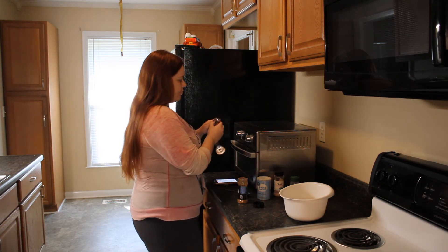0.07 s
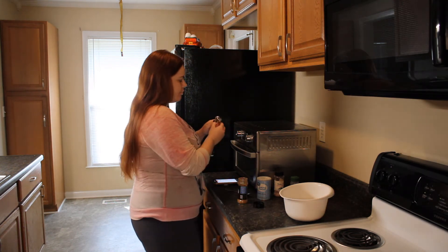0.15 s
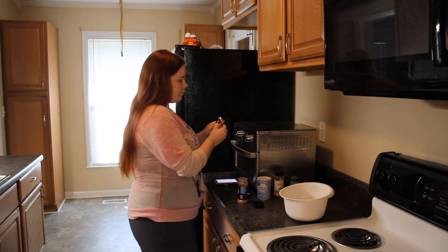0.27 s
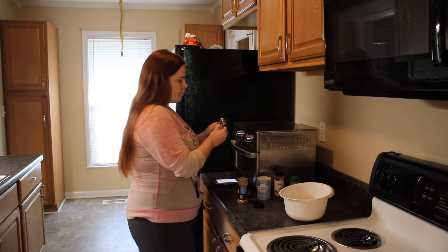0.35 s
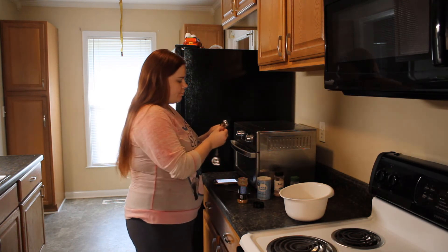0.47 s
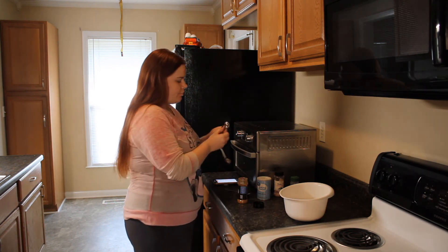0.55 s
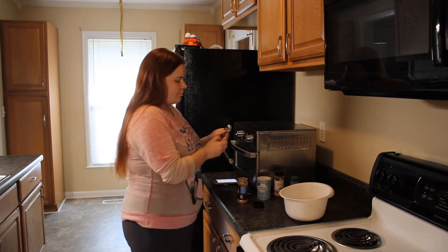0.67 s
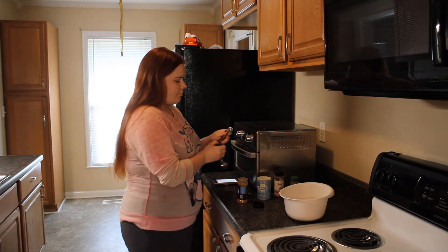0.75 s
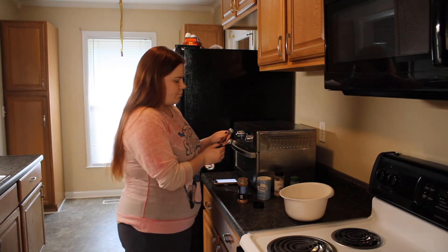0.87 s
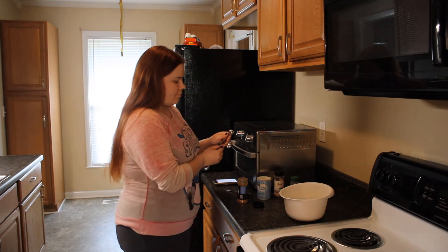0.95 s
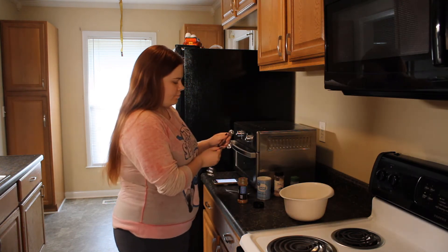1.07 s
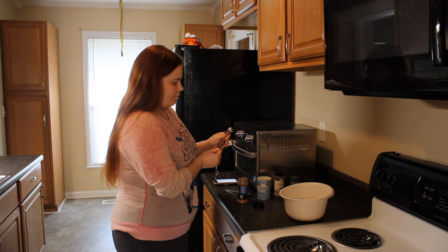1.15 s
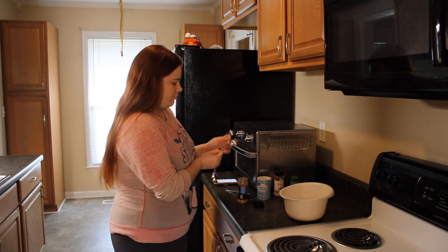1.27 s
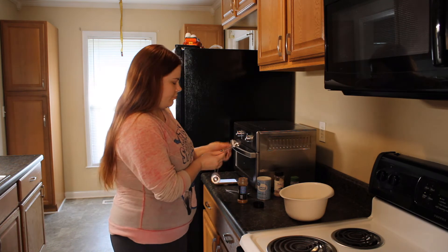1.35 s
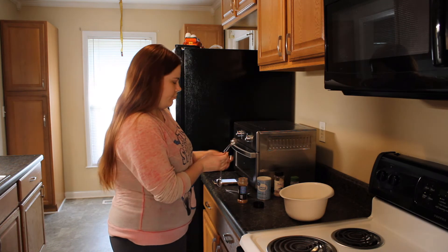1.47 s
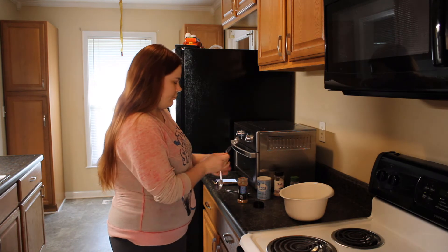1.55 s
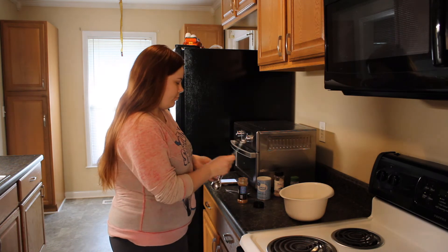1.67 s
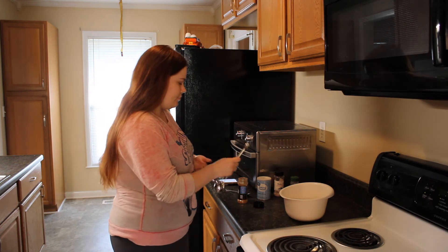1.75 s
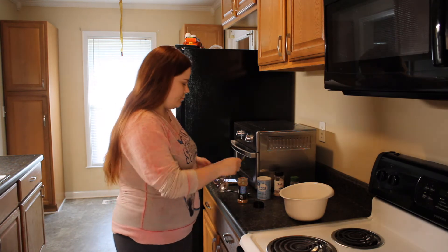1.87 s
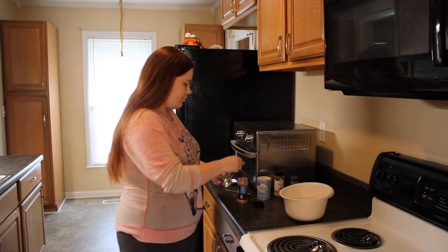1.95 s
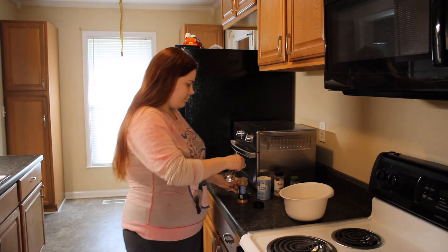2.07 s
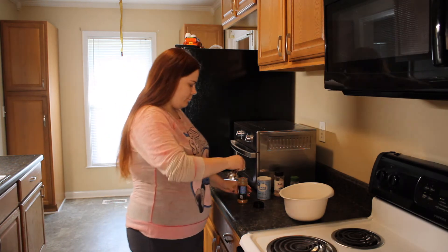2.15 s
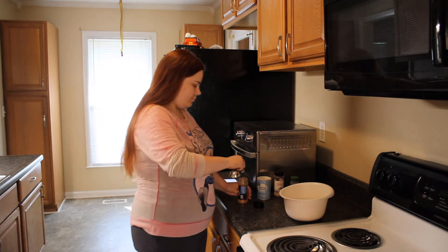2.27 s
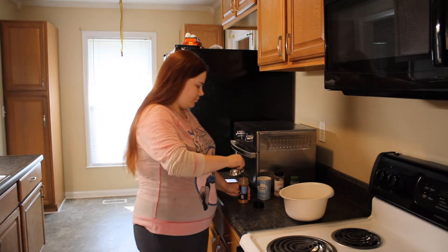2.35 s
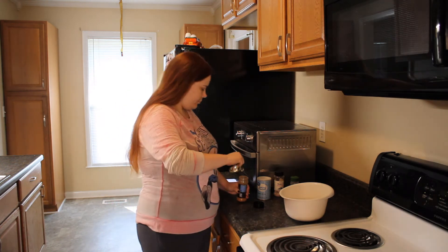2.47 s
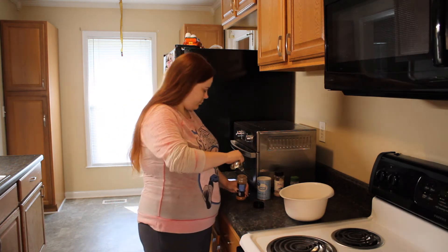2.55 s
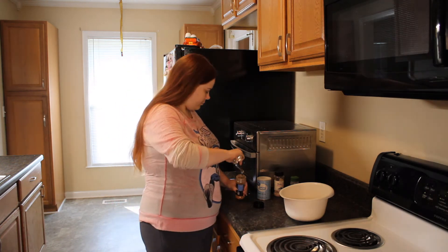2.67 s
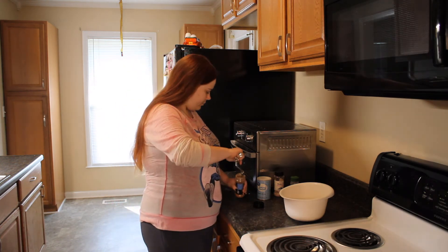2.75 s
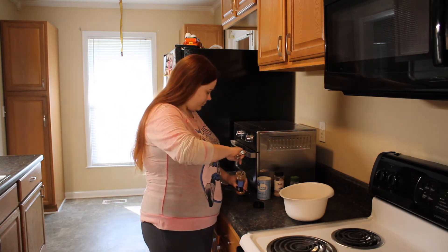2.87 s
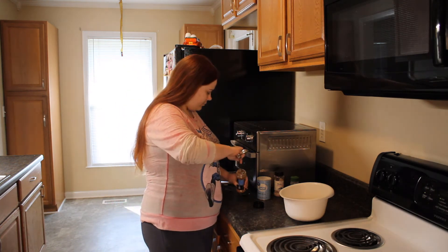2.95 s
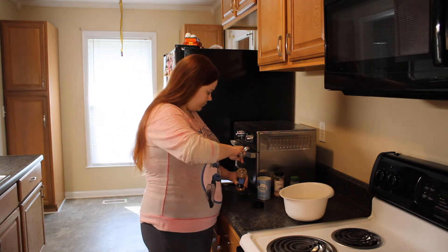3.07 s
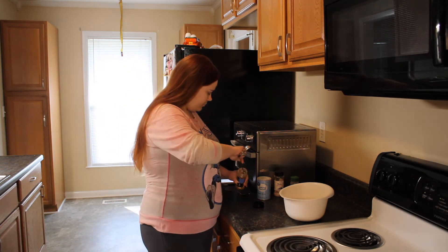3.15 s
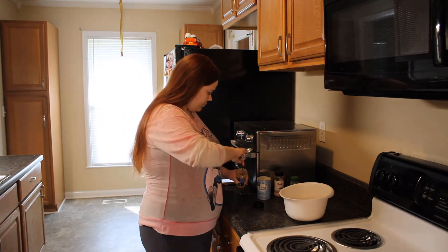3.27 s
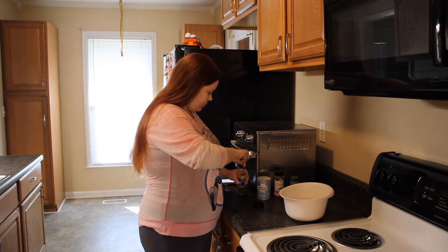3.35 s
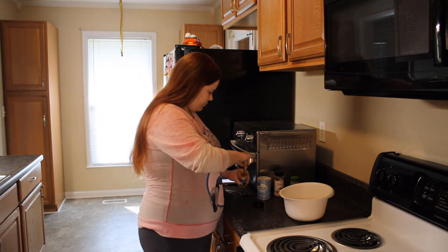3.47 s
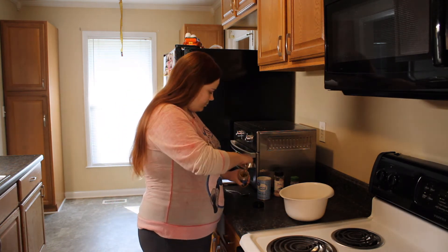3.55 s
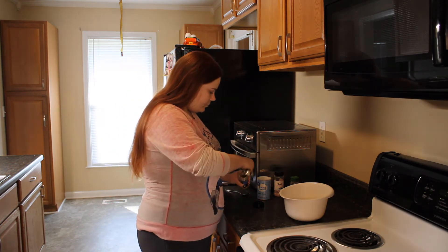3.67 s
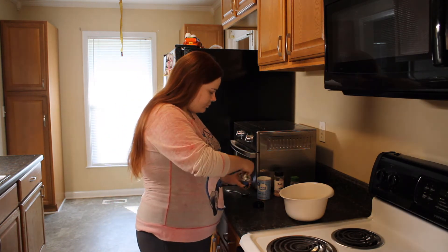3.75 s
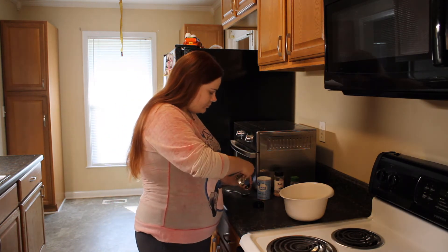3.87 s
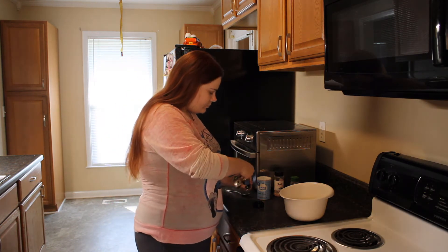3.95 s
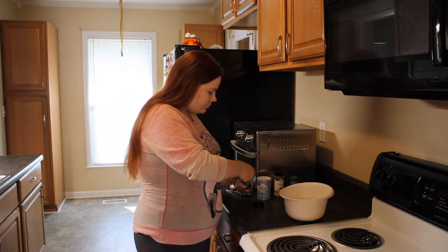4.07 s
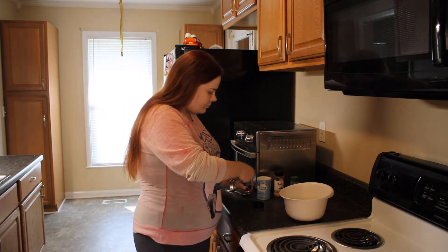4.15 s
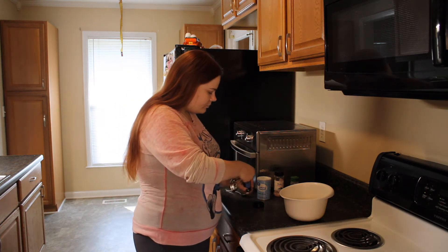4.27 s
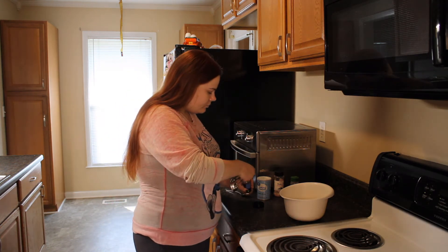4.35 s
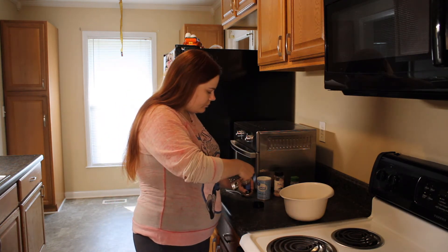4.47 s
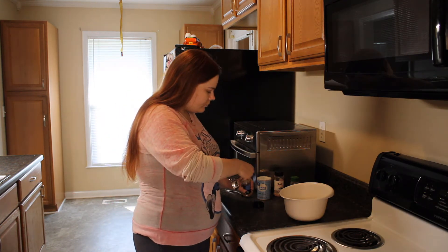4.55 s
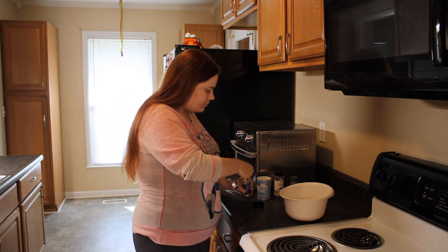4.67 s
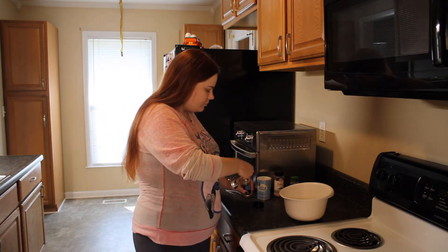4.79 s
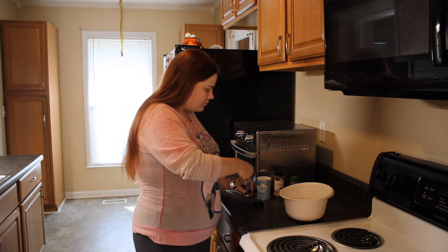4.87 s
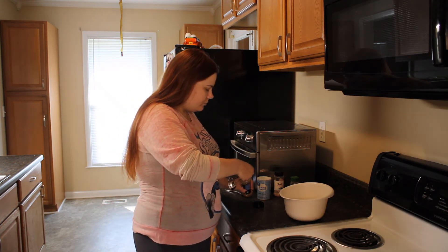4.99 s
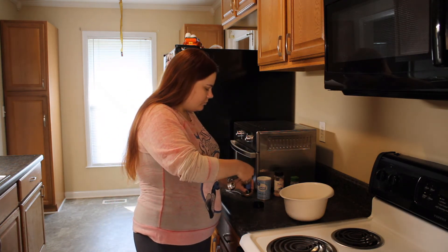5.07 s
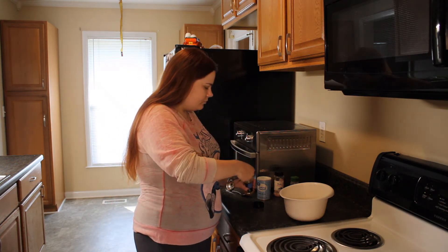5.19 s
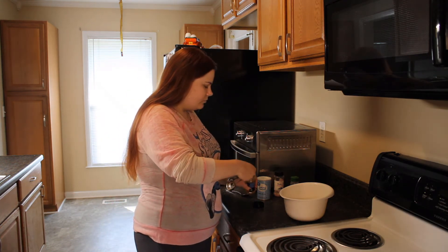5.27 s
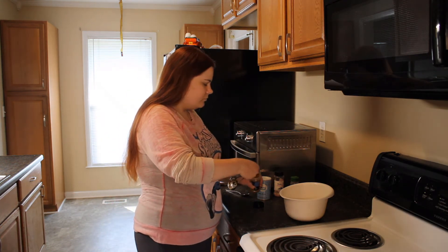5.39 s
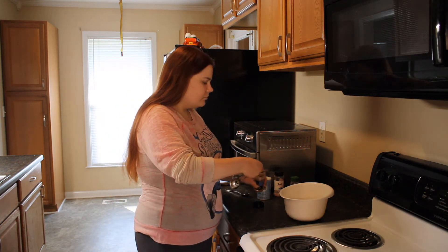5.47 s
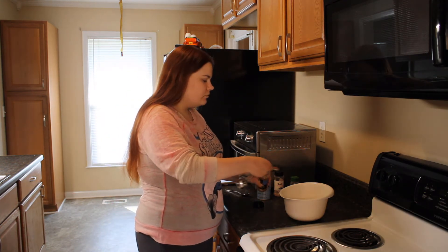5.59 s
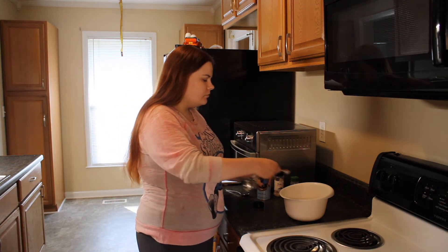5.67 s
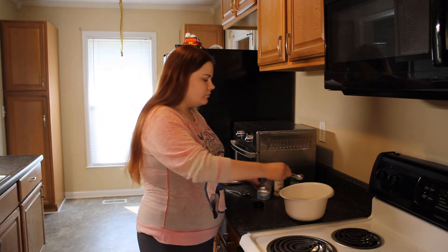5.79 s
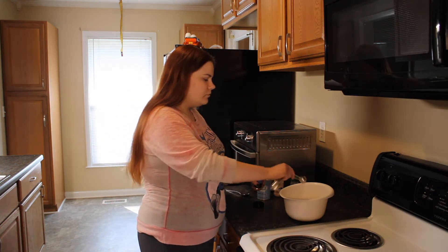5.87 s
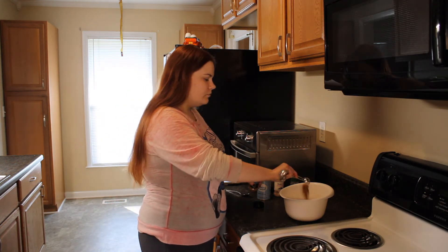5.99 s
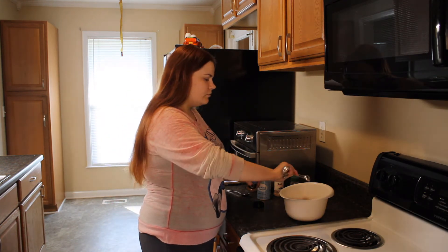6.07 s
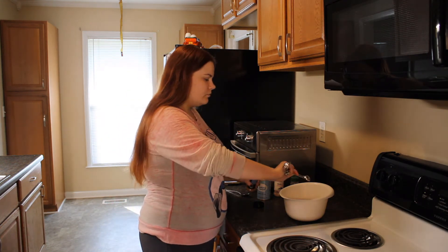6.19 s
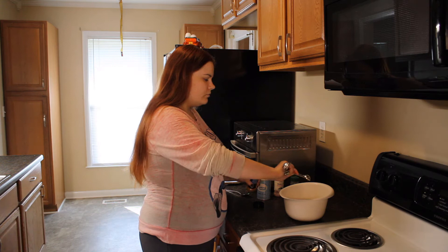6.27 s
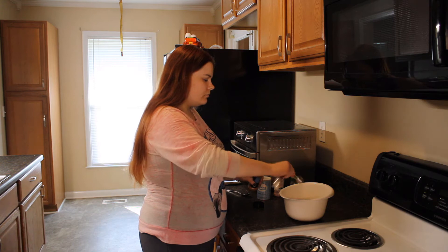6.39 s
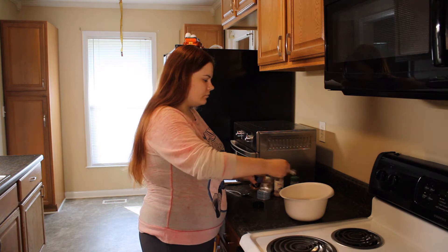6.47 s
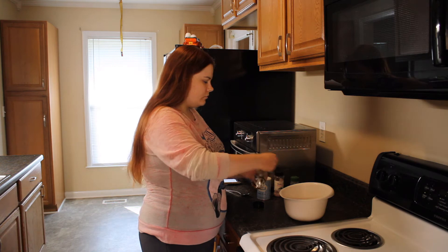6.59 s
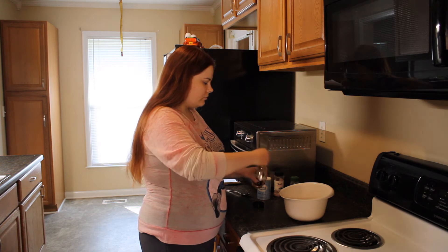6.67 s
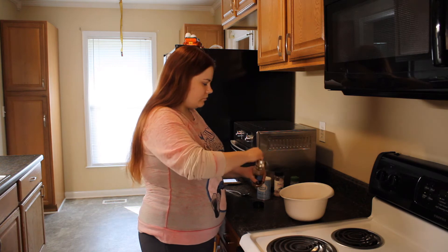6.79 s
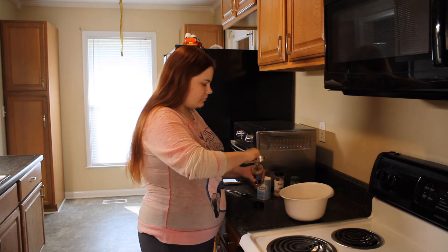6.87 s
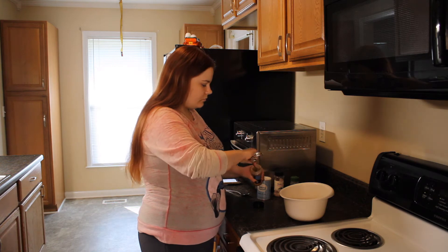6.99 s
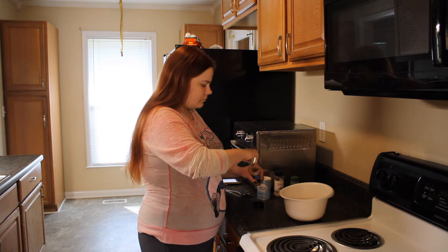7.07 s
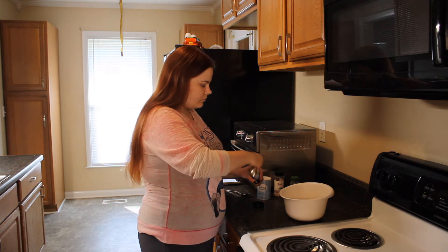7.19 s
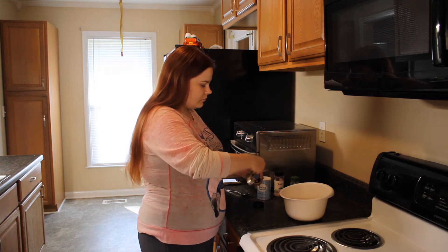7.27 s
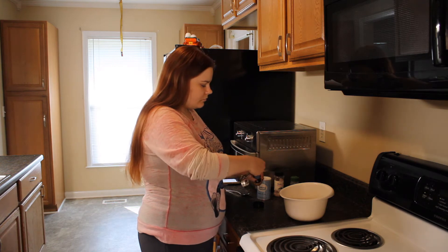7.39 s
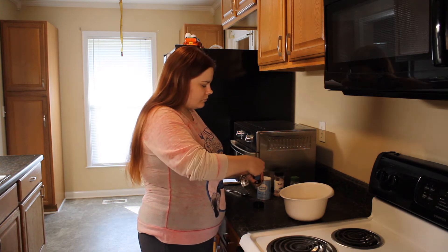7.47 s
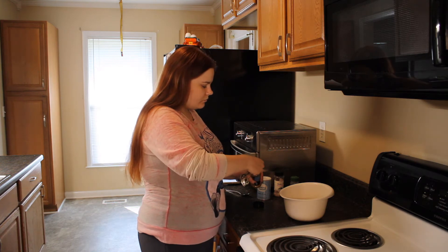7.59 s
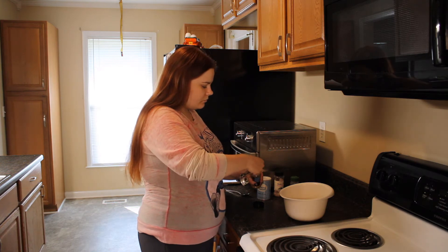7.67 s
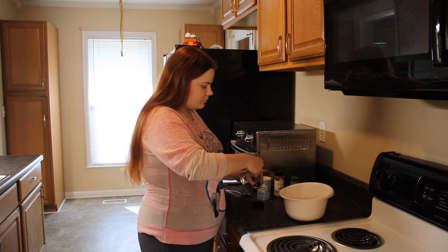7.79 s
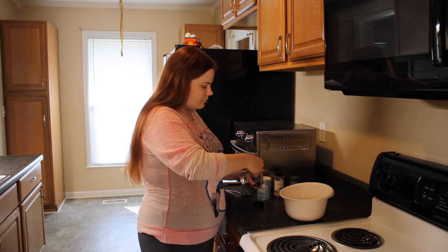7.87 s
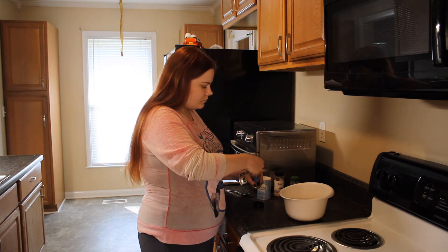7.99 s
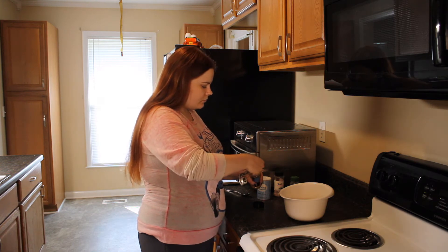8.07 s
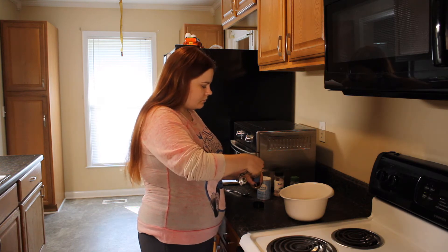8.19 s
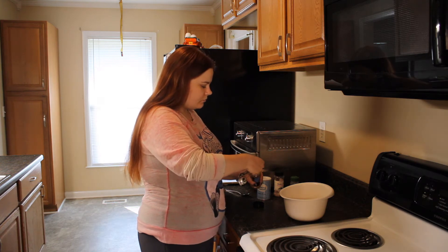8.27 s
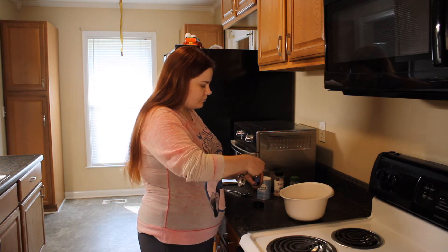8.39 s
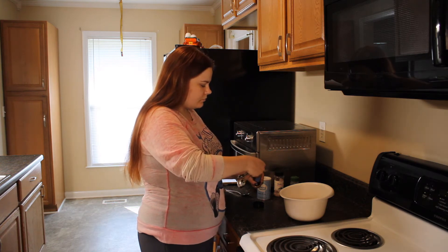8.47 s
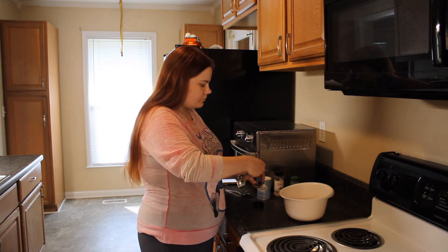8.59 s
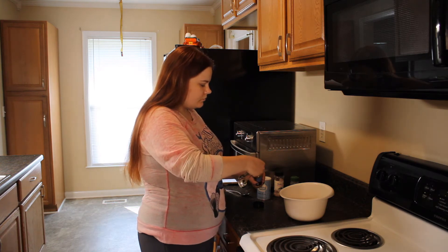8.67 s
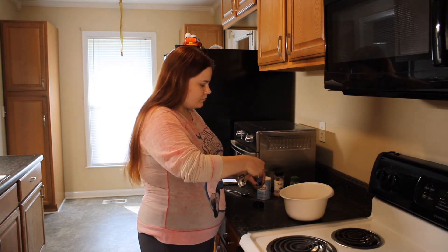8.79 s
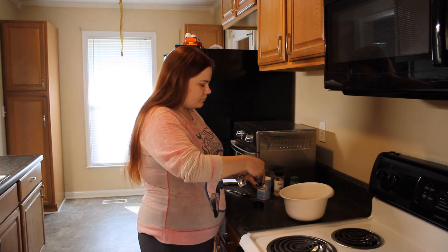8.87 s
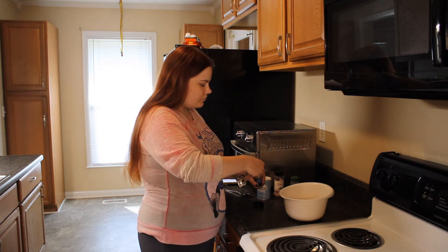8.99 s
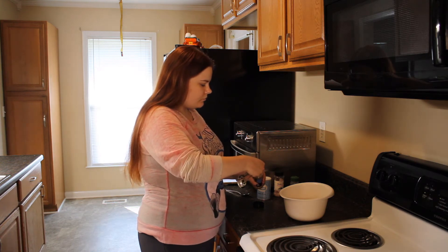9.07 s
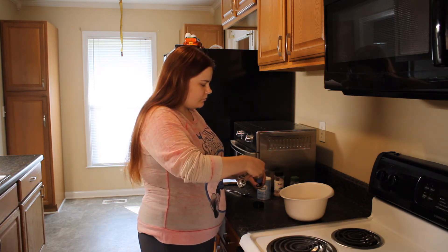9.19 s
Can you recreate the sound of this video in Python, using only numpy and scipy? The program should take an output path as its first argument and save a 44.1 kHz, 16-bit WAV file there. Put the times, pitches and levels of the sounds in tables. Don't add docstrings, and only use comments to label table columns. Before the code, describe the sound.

Bright clinking of thin metal spoons builds to a sharp clatter, followed by quiet jar bumps, ticks and isolated knocks in a hard, humming kitchen.

```python
import sys
import numpy as np
from scipy import signal
from scipy.fft import rfft, irfft
from scipy.io import wavfile
from scipy.ndimage import uniform_filter1d

SR = 44100
rng = np.random.default_rng(int(sys.argv[2]) if len(sys.argv) > 2 else 0)


def digitize_waveform(pressure):
    field = np.atleast_2d(pressure).T
    bounded = np.clip(field, -1, 1)
    quanta = np.round(bounded * 32767).astype(np.int16)
    wavfile.write(sys.argv[1], SR, quanta)


def makeup_ratio(level_db):
    decades = np.asarray(level_db, float) / 20
    return 10 ** decades


N = 407043


def evened(x):
    return x / np.sqrt(np.mean(x ** 2) + 1e-20)


def read(points, hz):
    f, value = np.transpose(points)
    return np.interp(np.log(hz + 1), np.log(f + 1), value)


def add(mix, start_s, sound):
    part = mix[round(start_s * SR):][:len(sound)]
    part += sound[:len(part)]


def noise(points, size):
    spectrum = rfft(rng.standard_normal(size))
    gain = makeup_ratio(read(points, np.fft.rfftfreq(size, 1 / SR)))
    return evened(irfft(spectrum * gain, size))


def levelled(sound, db):
    return makeup_ratio(db) * sound / np.sqrt(uniform_filter1d(sound ** 2, 88).max())


def coloured(x, colour, smooth_hz):
    z, hz = rfft(x), np.fft.rfftfreq(len(x), 1 / SR)
    bins = max(int(smooth_hz / hz[1]), 1)
    lumps = np.sqrt(abs(uniform_filter1d(abs(z) ** 2, bins)) + 1e-12)
    cepstrum = irfft(np.log(makeup_ratio(read(colour, hz)) / lumps))
    cepstrum[1:len(x) // 2] *= 2
    cepstrum[len(x) // 2 + 1:] = 0
    return irfft(z * np.exp(rfft(cepstrum)))


# pitch_hz, level_db (per Hz)
HISS = [(20, -15.5), (40, -7), (80, -13.5), (150, -10), (300, -10.5), (500, -13), (1000, -16.5),
        (2200, -20.5), (3650, -23.5), (6000, -28), (8900, -33.5), (12000, -40.5), (15500, -49)]
# pitch_hz, level_db
FRIDGE_HUM = [(120, -70.5), (240, -56.5), (323, -76), (360, -66.5), (600, -75), (1081, -74)]


def background():
    t = np.arange(N) / SR
    hum = np.zeros(N)
    for hz, db in FRIDGE_HUM:
        waver_db = 2.27 * np.sin(2 * np.pi * (0.606 * t + rng.random()))
        hum += makeup_ratio(db + 1.5 + waver_db) * np.sin(2 * np.pi * (hz * t + rng.random()))
    return makeup_ratio(-52.5) * noise(HISS, N) + hum


def chatter(length_s):
    when, size = rng.random((2, 12))
    place = np.clip(when * length_s * 2 * SR, 0, 2047).astype(int)
    train = np.zeros(2048)
    np.add.at(train, place, (size - 0.5) * 1.72 * (1 - when))
    train[0] += 1
    return train


def burst(colour, train, t60):
    t = np.arange(4096) / SR
    puff_power = makeup_ratio(-120 * t / t60) * (1 - np.exp(-t / 0.00063))
    envelope = np.sqrt(abs(signal.fftconvolve(train ** 2, puff_power)[:len(t)]))
    return coloured(envelope * rng.standard_normal(len(t)), colour, smooth_hz=350)


def strike(modes, crack, row, tilt_hz, crack_t60, held, least_width):
    start_s, db, dull_db = row
    damping, chatter_s, outer_db, crack_db = held
    hz, width, mode_db = (np.tile(c, 2)[:, None] for c in np.transpose(modes))
    tilt = list(zip(tilt_hz, (outer_db + dull_db, 0, outer_db - dull_db)))
    place, detune, late = rng.standard_normal((3, *hz.shape))
    width = np.maximum(width * damping, least_width)
    is_twin = (np.arange(len(hz)) >= len(modes))[:, None]
    hz = hz + 0.35 * width * detune * is_twin
    t = np.maximum(np.arange(6144) / SR - 0.45 * chatter_s * abs(late), 0)
    fade = np.exp(-np.pi * width * t) * (1 - np.exp(-t / 0.0011))
    gain = width * makeup_ratio(mode_db + 1.2 * place + read(tilt, hz))
    sound = levelled((gain * fade * np.sin(2 * np.pi * hz * t)).sum(0), 0)
    crack_colour = [(f, level_db + read(tilt, f)) for f, level_db in crack]
    add(sound, 0, levelled(burst(crack_colour, chatter(chatter_s), crack_t60), crack_db))
    return start_s, levelled(sound, db)


# pitch_hz, width_hz, level_db
TINY_MODES = [(3210, 59, -5), (3950, 78, -7), (4600, 160, -8), (5520, 180, 1), (6100, 34, -4),
              (6200, 48, -5), (6570, 140, -13), (7540, 19, -12), (7820, 110, -8), (8270, 36, -10),
              (8500, 32, -8), (9100, 49, -11), (11000, 90, -17)]
SMALL_MODES = [(1780, 26, -3.5), (2950, 56, -2.5), (3700, 30, -5), (4070, 55, -2), (4360, 26, -5),
               (4660, 210, 4), (5070, 35, 0), (5300, 29, -2), (5640, 190, 1), (5860, 39, 0), (6520, 38, 4),
               (7100, 75, -1), (7220, 35, -8), (7700, 40, -4), (8610, 46, -22), (9140, 35, -9),
               (10660, 42, -15), (10800, 80, -11)]
MIDDLE_MODES = [(2950, 43, -19), (3990, 30, -6), (4130, 50, -4), (4730, 180, -2), (4870, 28, -5),
                (5150, 25, -15), (5400, 28, -19), (5920, 82, -20), (6500, 66, -2), (6730, 15, -5),
                (7490, 34, 4), (7730, 33, 0), (7950, 68, -7), (8540, 51, -16), (8790, 41, -11),
                (9060, 60, -8), (10900, 58, -13.5), (13400, 41, -30)]
LARGE_MODES = [(2296, 72, -24.5), (2570, 97, -21), (2940, 25, -11), (3630, 65, 3), (4650, 39, -11.5),
               (4930, 24, -5.5), (5444, 110, -14), (5700, 40, -5), (6200, 42, -23), (6170, 73, -7),
               (6740, 59, 4), (7580, 98, 4.5), (7800, 15, 8), (8130, 50, 5.5), (8680, 29, -17),
               (9070, 32, -6.5), (9800, 57, -16), (10100, 100, -6), (10300, 27, -18), (10800, 32, -18),
               (11300, 57, -26), (11400, 45, -27), (11700, 52, -25), (12200, 55, -21), (12500, 100, -24),
               (12600, 15, -25), (13500, 74, -24), (14000, 36, -29)]
SHAKEN_MODES = [(1680, 130, -25.5), (3490, 26, -14), (3720, 91, -7), (4120, 43, -13.5), (4930, 29, -8.5),
                (5670, 38, -12), (6030, 230, -11), (6600, 47, -8.5), (6720, 16, -10), (7010, 39, -7),
                (7350, 33, -8), (7600, 45, -5), (7800, 45, 0.5), (7800, 59, -12), (8260, 110, -20),
                (8820, 41, -17), (9070, 37, -14), (9810, 42, -24), (10300, 46, -25), (10600, 30, -21),
                (10800, 47, -22), (11500, 34, -17), (12040, 36, -17.5), (12060, 31, -19.5),
                (12600, 32, -25), (13500, 38, -35), (14200, 43, -40.5), (15000, 95, -41)]
DROPPED_MODES = [(1680, 110, -23), (3630, 40, -7), (3960, 16, -12.5), (4140, 55, -9), (4650, 49, -13.5),
                 (4890, 45, -16.5), (5220, 24, -17), (5250, 64, -13), (5600, 41, -4.5), (5990, 31, -3),
                 (6130, 30, 4), (6380, 19, -2), (6620, 38, -4), (7420, 22, -5), (7730, 31, -9),
                 (7900, 20, -10.5), (8320, 38, -12.5), (8720, 29, -26.5), (9010, 71, -14.5),
                 (10110, 26, -27), (10300, 34, -26), (10800, 32, -17.5), (11500, 85, -24), (12100, 38, -16),
                 (12800, 34, -27), (13300, 26, -30.5), (13500, 30, -32), (13900, 79, -35)]
CROSSED_MODES = [(3070, 26, -14), (3770, 68, 0.5), (4500, 81, -11), (4900, 23, -10.5), (5370, 50, -13),
                 (5810, 36, -4.5), (6600, 67, -7.5), (7740, 67, -3.5), (8000, 26, -9.5), (8610, 30, -14),
                 (9060, 30, -10), (9800, 87, -19.5), (10290, 65, -10), (12000, 50, -17)]
SWUNG_MODES = [(3730, 120, 2), (4110, 41, -13), (4600, 30, -16.5), (4940, 24, -9), (6100, 36, -13.5),
               (6690, 41, -7), (7630, 110, -11.5), (7800, 30, -11), (9290, 63, -19.5), (10200, 130, -21),
               (11100, 30, -19.5), (12200, 24, -16), (12600, 38, -26.5), (13500, 29, -29)]
# start_s, level_db, dullness_db
TINY_CLINKS = [
    (0.0298, -22, -1.5),
]
SMALL_CLINKS = [
    (0.177, -17, 1.3),
    (0.4, -39, 0),
]
MIDDLE_CLINKS = [
    (0.588, -33, 8),
    (0.601, -21, -1),
    (.614, -28.5, 12),
]
LARGE_CLINKS = [
    (0.927, -16.5, 0.5),
    (.941, -24, 1),
    (1.141, -29, 2),
    (1.154, -17.5, 1),
    (1.237, -27, 1.5),
]
SHAKEN_CLINKS = [
    (1.592, -19.5, 0.00035),
    (1.668, -22, 0),
]
DROPPED_CLINKS = [
    (1.760, -6.5, 4.5),
    (1.7655, 0.5, 1.5),
    (1.7686, -13.5, 4),
    (1.774, -8, -2),
    (1.776, -15.5, -9),
    (1.787, -12.5, -2),
    (1.789, -16, -7),
    (1.803, -35.5, -1.5),
    (1.808, -29.5, 6),
]
CROSSED_CLINKS = [
    (1.297, -20, 0),
    (1.307, -21, 4),
]
SWUNG_CLINKS = [
    (1.449, -34.5, 2),
    (1.468, -16.5, -0.5),
    (1.52, -24, -0.5),
    (1.54, -23, 0.5),
]
# damping_ratio, chatter_s, outer_modes_db, crack_db
SPOON_GRIPS = [
    (2.1, .005, 8, -6),
    (2.4, .006, -1.5, -13),
    (4.1, 0.0056, 9, 0),
    (3.6, 0.0041, 9.5, 2.5),
    (2, 0.0066, 3.5, -2.5),
    (4.3, .0005, -1.5, 2),
    (2.1, .005, 5.5, 0),
    (3, .005, 3, -1.5),
]
# pitch_hz, level_db
METAL_CRACK = [(1200, -24), (2800, -12), (4000, -8), (6500, 6), (8500, -6.5), (10000, -15.5),
               (15000, -27.5)]


def spoons():
    out = np.zeros(N)
    shake = [(1.620 + k * 0.0052, -8.5 - 1.42 * k ** 2, -1) for k in range(-2, 3)]
    played = [(TINY_MODES, TINY_CLINKS), (SMALL_MODES, SMALL_CLINKS), (MIDDLE_MODES, MIDDLE_CLINKS),
              (LARGE_MODES, LARGE_CLINKS), (SHAKEN_MODES, SHAKEN_CLINKS + shake),
              (DROPPED_MODES, DROPPED_CLINKS), (CROSSED_MODES, CROSSED_CLINKS), (SWUNG_MODES, SWUNG_CLINKS)]
    for (modes, clinks), grip in zip(played, SPOON_GRIPS):
        for row in clinks:
            add(out, *strike(modes, METAL_CRACK, row, (3700, 6500, 11000), 0.0065, grip, least_width=85))
    return out


def ring(start_s, db, hz, t60, rise_s):
    t = np.arange(16384) / SR
    return start_s, makeup_ratio(db - 60 * t / t60) * (1 - np.exp(-t / rise_s)) * np.sin(2 * np.pi * hz * t)


# start_s, level_db, pitch_hz, t60_s
HANDLES = [(.031, -39, 5520, 0.14), (0.177, -40.5, 2950, 0.42), (.178, -52, 9070, .3),
           (.602, -45, 9060, .35), (.93, -36, 6750, .2), (.93, -33, 7650, .1), (1.155, -30, 7620, .07),
           (.945, -32.5, 3623, 0.15), (.93, -44, 9060, .3), (1.155, -37, 8125, .3), (1.142, -41, 9065, .3),
           (1.238, -47, 9065, .2), (1.298, -41, 4931, .6), (1.298, -36, 3790, .12), (1.299, -45, 9070, .15),
           (1.472, -35, 4931, .16), (1.467, -33.5, 3768, .2), (1.48, -38.5, 6700, .15),
           (1.573, -22, 3800, .1), (1.611, -19, 7800, .08), (1.622, -17.5, 7800, .1),
           (1.761, -13, 3630, .06), (1.768, -15, 3510, .05), (1.574, -35.5, 5700, .15),
           (1.585, -33, 7810, .2), (1.576, -37, 9060, .2), (1.614, -27.5, 4931, .2), (1.79, -16, 6620, .12),
           (1.79, -31.5, 9010, .12)]


def handles():
    out = np.zeros(N)
    for row in HANDLES:
        add(out, *ring(*row, rise_s=0.006))
    return out


def tick(start_s, db, hz, width, chatter_s):
    colour = [(hz - 2 * min(width, hz / 3), -30), (hz - width / 2, -4), (hz, 0),
              (hz + width / 2, -4), (hz + 3.36 * width, -30), (22000, -60)]
    return start_s, levelled(burst(colour, chatter(chatter_s), 0.02), db)


def ticks(rows):
    out = np.zeros(N)
    for row in rows:
        add(out, *tick(*row))
    return out


# start_s, level_db, pitch_hz
PINGS = [(0.144, -33.5, 6100), (.179, -37, 1710), (.311, -38, 5530), (0.929, -36.5, 1340),
         (3.779, -39.5, 3180), (3.781, -34, 5700), (3.940, -34, 1290), (4.184, -38, 4930),
         (4.185, -44, 7950), (4.462, -27, 3970), (5.972, -40.5, 6100), (6.299, -48, 5870),
         (6.847, -35, 5160), (7.22, -38.5, 6070), (7.705, -35, 4460), (7.775, -35, 5900),
         (8.086, -29, 5980), (8.753, -25, 3970), (9.088, -33, 4350), (9.09, -33, 1720)]
# start_s, level_db, pitch_hz
RATTLES = [(3.146, -42, 6530), (3.942, -37, 7100), (6.787, -26.5, 1220), (6.846, -29.5, 2930),
           (6.913, -27.5, 6880), (7.31, -46, 7100), (8.11, -44, 6200), (4.464, -24, 3800),
           (4.54, -28, 3800), (8.755, -27, 4300), (.617, -28, 4400)]


def pings_and_rattles():
    rows = [(s, db, hz, 0.17 * hz, 0.0042) for s, db, hz in PINGS]
    rows += [(s, db, hz, 0.28 * hz, 0.0042) for s, db, hz in RATTLES]
    return ticks(rows)


# pitch_hz, width_hz, level_db
JAR_MODES = [(522, 27, 5.5), (700, 68, 0), (960, 26, -8), (1030, 29, -13.5), (1630, 150, 1), (2090, 34, 5),
             (2280, 71, -28), (2590, 36, -2), (3790, 15, 4), (4100, 43, -13), (4320, 29, 2),
             (5160, 19, -12), (5320, 16, -8), (5800, 34, -16), (6400, 130, -20)]
LID_MODES = [(543, 36, -2.5), (895, 24, 3.5), (1090, 22, -4.5), (1590, 150, -2), (2330, 74, -7),
             (2560, 32, 1.5), (2460, 63, -4), (2810, 43, -7), (3060, 46, -10), (3680, 27, -6),
             (4000, 77, -5), (5240, 24, -12)]
BOWL_MODES = [(504, 34, -4), (896, 24, -2), (1135, 23, -1), (2040, 50, -11), (3400, 28, -10),
              (4160, 51, -16), (5000, 53, -5), (5650, 28, -20)]
RIM_MODES = [(520, 34, -3), (894, 24, 2), (1050, 19, -9), (1570, 89, -8), (1760, 37, 3), (2130, 22, -5),
             (2290, 30, -14), (2615, 39, 1), (3230, 36, -19), (3810, 19, -5), (3920, 54, -2),
             (4410, 80, -8), (5330, 37, -9), (6900, 86, -12)]
# start_s, level_db, dullness_db
JAR_KNOCKS = [
    (7.848, -28.5, 4),
    (8.085, -19, 0.5),
]
LID_KNOCKS = [
    (4.461, -13, -1),
    (4.537, -17.5, 0.5),
    (4.61, -27, 5),
]
BOWL_KNOCKS = [
    (1.064, -30.5, -3.5),
    (2.132, -28, -3.5),
    (6.844, -24.5, -2.5),
    (6.914, -28, -4),
    (7.704, -23.5, 7),
]
JAR_BUMPS = [
    (2.895, -28, 14),
    (3.073, -34.5, 4.6),
    (3.938, -29, 6.2),
    (4.337, -25, 16),
    (4.734, -30, 8.9),
    (6.787, -22.5, 14),
    (7.599, -33, 9.7),
    (8.686, -28, 14),
]
RIM_KNOCKS = [
    (8.753, -19.5, 0),
    (8.95, -24, -2),
    (9.087, -24, 2),
]
# damping_ratio, chatter_s, outer_modes_db, crack_db
JAR_GRIPS = [
    (3.4, 0.00402, 1.5, 4.9),
    (3.5, 0.00403, 0, 1.6),
    (2.1, 0.00404, -1.5, 5.5),
    (9.7, 0.00441, 4.5, 2.1),
    (3.3, 0.00402, 2, 2),
]
# pitch_hz, level_db
KNOCK_CRACK = [(90, -66), (250, -29.5), (500, 12.5), (1500, 8), (4500, 3.5), (7500, -14), (10000, -22.5),
               (14000, -46)]


def jars():
    out = np.zeros(N)
    played = [(JAR_MODES, JAR_KNOCKS), (LID_MODES, LID_KNOCKS), (BOWL_MODES, BOWL_KNOCKS),
              (JAR_MODES, JAR_BUMPS), (RIM_MODES, RIM_KNOCKS)]
    for (modes, knocks), grip in zip(played, JAR_GRIPS):
        for row in knocks:
            add(out, *strike(modes, KNOCK_CRACK, row, (750, 2200, 5000), 0.02, grip, least_width=240))
    return out


# start_s, level_db
RING_TICKS = [(1.085, -52), (1.201, -51), (1.264, -49), (1.447, -44), (1.55, -45.5), (1.988, -49)]
CAP_TICKS = [(1.882, -54), (1.945, -55), (2.023, -53), (2.066, -50), (2.165, -46), (2.576, -53.5),
             (3.267, -44), (3.48, -49), (3.549, -47.5)]
# start_s, level_db, pitch_hz, width_hz, chatter_s
THUD = [
    (3.937, -41, 230, 150, .008),
]


def near_ticks():
    rows = [(s, db, 1570, 1800, 0.0038) for s, db in RING_TICKS]
    rows += [(s, db, 2240, 1900, 0.0055) for s, db in CAP_TICKS]
    return ticks(rows + THUD)


# start_s, level_db
RUSTLE = [
    (1.898, -59),
    (2.25, -61),
    (3.87, -59),
    (4.4, -58),
]
# pitch_hz, level_db
RUSTLE_COLOUR = [(400, -1.5), (1000, -5.5), (2500, -5), (5000, -6.5), (8000, -9), (12000, -35.5)]


def rustle():
    start_s, db = np.transpose(RUSTLE)
    level = makeup_ratio(np.interp(np.arange(N) / SR, start_s, db, left=-120, right=-120))
    lumps = makeup_ratio(3.2 * evened(uniform_filter1d(rng.standard_normal(N), 500)))
    return level * evened(noise(RUSTLE_COLOUR, N) * lumps)


# pitch_hz, width_hz, level_db
CAP_MODES = [(1720, 110, -7), (2390, 140, 8), (3330, 110, -2), (4550, 180, -13), (5460, 110, -20)]
# start_s, level_db
CAP_TAPS = [
    (3.267, -40.5),
    (3.481, -45),
    (3.548, -43),
]


def cap_taps():
    out = np.zeros(N)
    for start_s, db in CAP_TAPS:
        for hz, width, mode_db in CAP_MODES:
            add(out, *ring(start_s, db + mode_db, hz, 3.8 / width, rise_s=0.002))
    return out


def squeak(start_s, length_s, hz, db, sag):
    size = round(length_s * SR)
    waver, grip = (evened(uniform_filter1d(v, 600))[:size] for v in rng.standard_normal((2, 16384)))
    pitch = hz * (1 + 0.012 * waver - sag * np.arange(size) / size)
    tone = np.sin(2 * np.pi * np.cumsum(pitch) / SR)
    return start_s, makeup_ratio(db + 4 * grip) * tone * np.hanning(size)


# start_s, length_s, pitch_hz, level_db
SQUEAKS = [
    (6.041, 0.12, 1300, -47),
    (8.65, 0.13, 1720, -49),
    (8.5, 0.19, 3450, -57),
    (5.15, .15, 3400, -61),
    (5.72, .15, 3400, -61),
]


def squeaks():
    out = np.zeros(N)
    for row, sag in zip(SQUEAKS, [0, 0.12, 0, 0, 0]):
        add(out, *squeak(*row, sag))
    return out


# pitch_hz, t60_s
ROOM_DECAY = [(300, 0.44), (800, 0.42), (2000, 0.44), (5500, 0.42), (9000, 0.38), (14000, 0.27)]
# pitch_hz, level_db
CUPBOARDS = [(530, -0.5), (670, -3.5), (850, 0.5), (1350, -0.5)]


def tail():
    taps = np.zeros(SR // 2)
    at = np.arange(200, len(taps) - 20, 20) + rng.integers(0, 20, (len(taps) - 201) // 20)
    taps[at] = rng.choice([-1., 1.], at.shape)
    hz, t, z = signal.stft(taps, SR, nperseg=256)
    fade = makeup_ratio(-60 * t / read(ROOM_DECAY, hz)[:, None]) * (1 - np.exp(-t / 0.008))
    fading = signal.istft(z * fade, SR, nperseg=256)[1]
    fading = coloured(fading[:SR // 2], CUPBOARDS, smooth_hz=80)
    return fading / np.linalg.norm(fading)


# delay_s, level_db
ECHOES = [(.0024, -2), (.0051, -5.5), (.0083, -12), (0.013, -11), (0.02, -14), (.038, -15.5)]


def kitchen(x, tail_db):
    early = np.zeros(SR // 2)
    early[0] = 1
    for delay_s, db in ECHOES:
        early[round(delay_s * SR)] += makeup_ratio(db)
    out = signal.oaconvolve(x, coloured(early, CUPBOARDS, smooth_hz=145.6))
    turn = np.pi * 1.7 * np.arange(N) / SR
    for k in range(3):
        share = np.sqrt(2 / 3) * abs(np.cos(turn + k * np.pi / 3))
        out += makeup_ratio(tail_db) * signal.fftconvolve(x * share, tail())
    return out[:N]


def scene():
    near = near_ticks()
    metal = spoons() + handles() + pings_and_rattles()
    counter = jars() + cap_taps() + squeaks()
    far = metal + counter + makeup_ratio(6.0) * near
    return (makeup_ratio(-6.5) * kitchen(far, tail_db=-4.5) + near + rustle() + background())[None]


def top_cut(x):
    return signal.sosfilt(signal.butter(12, 15690, fs=SR, output="sos"), x)


def record(dry):
    lowpass = signal.firwin(255, 15300, window=("kaiser", 9), fs=SR)
    limited = signal.oaconvolve(dry, lowpass[None], "same")
    return top_cut(limited)


dry = scene()
out = record(dry)
digitize_waveform(out)
```